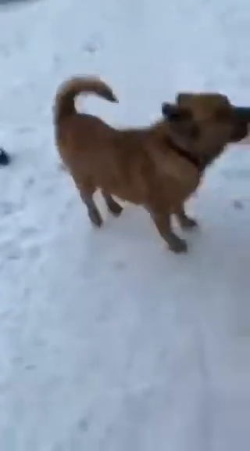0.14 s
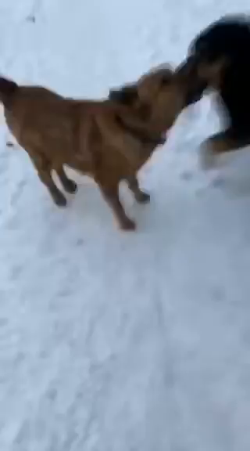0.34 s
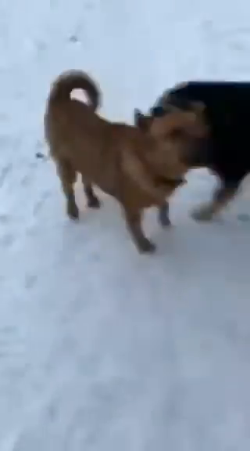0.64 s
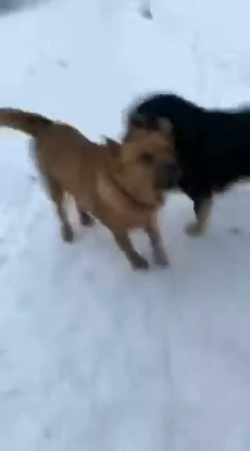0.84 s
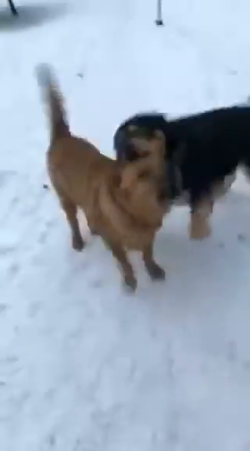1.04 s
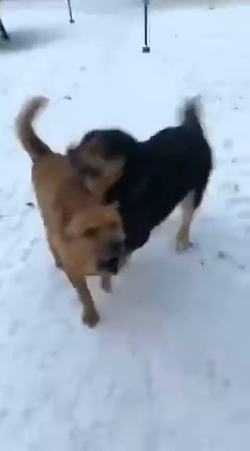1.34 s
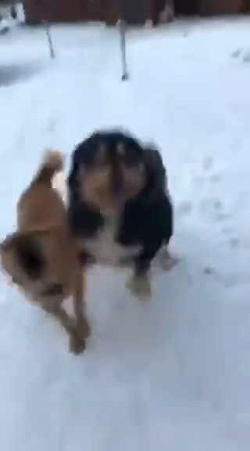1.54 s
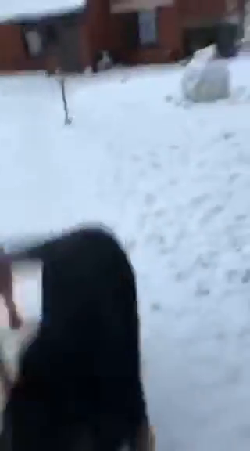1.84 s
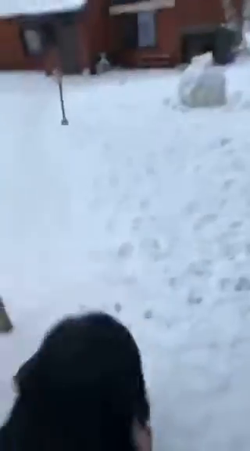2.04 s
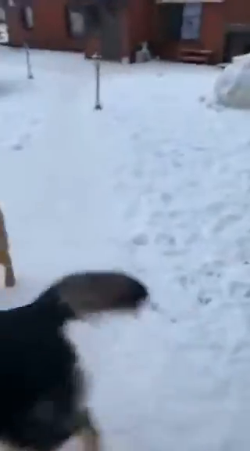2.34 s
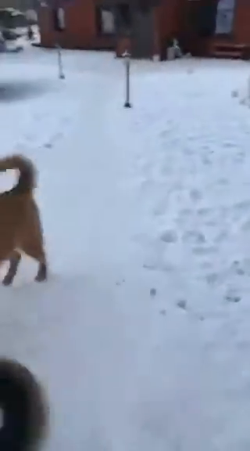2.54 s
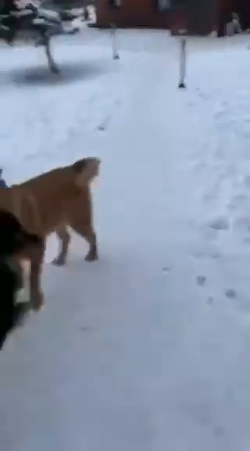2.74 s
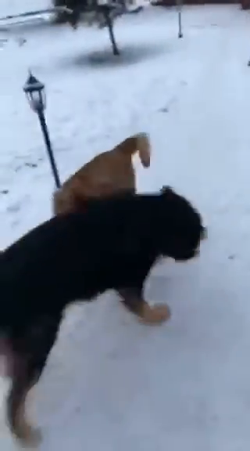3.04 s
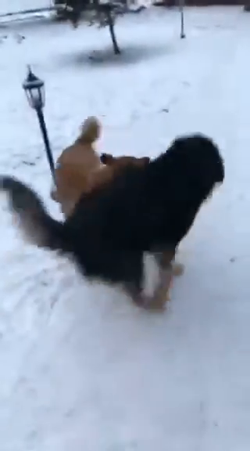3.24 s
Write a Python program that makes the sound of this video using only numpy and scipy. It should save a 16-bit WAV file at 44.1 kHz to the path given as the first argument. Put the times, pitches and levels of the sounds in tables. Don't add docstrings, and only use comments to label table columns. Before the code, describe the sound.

Gruff, raspy dog barks and growls at close range, with panting and snow crunches outdoors

```python
import sys
import numpy as np
from scipy import signal
from scipy.fft import rfft, irfft, next_fast_len
from scipy.io import wavfile
from scipy.ndimage import uniform_filter1d, map_coordinates

SR = 44100
rng = np.random.default_rng(int(sys.argv[2]) if len(sys.argv) > 2 else 0)


def boost(x):
    u = np.asarray(x, float) / 20
    return 10 ** u


def generate_wav(sig):
    pcm = np.round(np.clip(np.atleast_2d(sig).T, -1, 1) * 32767).astype(np.int16)
    wavfile.write(sys.argv[1], SR, pcm)


N = 149940

# time in seconds, level in dB.
WIND_LEVEL = [
    (0.0, -51),
    (2.91, -47.5),
    (3.4, -57.5),
]
# frequency in Hz, density in dB per Hz.
WIND_SPECTRUM = [(18, -17), (85, -4.5), (140, -9), (300, -19)]
# frequency in Hz, density in dB per Hz.
YARD_SPECTRUM = [(88, -38.5), (150, -6.5), (542, -6), (1300, -15.5), (4940, -26), (9000, -36.5),
                 (11700, -73.5), (19800, -120)]
# time in seconds, peak in dB.
CREAK_BEATS = [(.043, -33.5), (.107, -31), (0.598, -45), (0.641, -26), (0.684, -21.5), (0.729, -23.5),
               (1.145, -31.5), (1.197, -26.5), (2.106, -37), (2.157, -32.5), (2.203, -26), (2.253, -34)]
# frequency in Hz, width in Hz, level in dB.
CREAK_RESONANCES = [(85, 41, -11.5), (366, 88, -3), (990, 270, -10)]
# full strength at in seconds, rise in seconds, hold in seconds, level in dB, whistle in Hz.
PANTS = [
    (0.115, 0.022, 0.093, -39.5, 6120),
    (0.667, 0.14, 0.027, -41, 4500),
    (0.719, 0.043, 0.08, -41.5, 1970),
    (1.004, 0.072, 0.079, -48, 4400),
    (2.001, 0.019, 0.027, -49, 2200),
    (2.303, 0.08, 0.099, -42, 1990),
    (.54, 0.056, 0.084, -51.5, 1450),
    (3.25, 0.081, 0.096, -41.5, 4340),
]
# frequency in Hz, density in dB per Hz.
BREATH_SPECTRUM = [(410, -63), (700, -37), (905, -12.5), (975, -1.5), (4690, -8.5), (9000, -17.5),
                   (11700, -49), (19800, -120)]
# full strength at in seconds, rise, hold and fall in seconds, level in dB.
CALLS = [(.14, 0.035, .12, 0.063, -13.5), (0.447, 0.24, 0.036, 0.16, -28.5), (.815, 0.029, .13, 0.062, -15),
         (1.267, 0.2, 0.048, 0.07, -30), (1.371, 0.034, 0.099, 0.13, -14.5), (1.6, 0.16, 0.088, 0.075, -15),
         (1.831, 0.091, 0.091, 0.06, -15.5), (2.352, 0.055, 0.063, 0.21, -11.5),
         (2.58, 0.16, 0.0417, 0.062, -16.5), (2.739, 0.069, 0.069, 0.17, -14.5),
         (2.978, 0.15, 0.046, 0.11, -19), (1.001, 0.033, 0.1, 0.025, -40.5)]
# pitch in Hz, roughness 0-1, throat in Hz, mouth in Hz, mouth in dB.
VOICES = [(261.3, 0.64, 532, 723, -4.5), (204.3, 0.8, 390, 680, -7), (279.2, 0.66, 529, 693, -6),
          (197.8, 0.8, 590, 880, -11), (292.4, 0.8, 650, 950, -7.5), (258.3, 0.83, 527, 910, -10),
          (257, 0.8, 528, 876, -8.5), (274.3, .7, 529, 845, -8.5), (242, 0.89, 525, 1080, -14),
          (257.6, .8, 560, 1015, -8.5), (271, .9, 532, 840, 1.5), (208, 0.9, 530, 2300, -2)]
# low rasp in Hz, its level in dB, high rasp in Hz, its level in dB.
RASPS = [(1920, -31.5, 4400, -30), (1970, -24.5, 4720, -18.5), (2220, -22, 4150, -17.5),
         (2200, -8.5, 4820, -13), (2725, -20, 3960, -18), (2325, -24.5, 5020, -29),
         (2250, -28.5, 2800, -29), (2200, -29, 4300, -33.5), (2000, -40, 3320, -30.5),
         (2200, -33, 4340, -37.5), (1680, -24.5, 4700, -39.5), (2410, -9.5, 2700, -22.5)]
# frequency in Hz, level in dB.
UPPER_MOUTHS = [(1246, -18), (1300, -21), (1205, -16.5), (1400, -18.5), (1426, -15), (1400, -16),
                (1570, -15), (1370, -19), (1450, -23.5), (1490, -18), (1530, -19.5), (1400, -15.5)]
# start in seconds, length in seconds, from Hz, to Hz, level in dB.
LOCKS = [(.143, 0.045, 500, 535, -10), (.203, 0.025, 670, 430, -11.5), (.232, 0.042, 510, 450, -15),
         (0.2, 0.039, 700, 810, -17), (.128, 0.027, 350, 540, -16), (.797, 0.045, 301, 466, -15),
         (.825, 0.099, 483, 620, -12), (.855, 0.11, 263, 303, -21), (.805, 0.043, 880, 805, -18),
         (1.355, 0.036, 890, 990, -13.5), (1.36, 0.065, 560, 610, -10.5), (1.3, .025, 629, 520, -14.5),
         (1.385, 0.12, 330, 315, -25.5), (1.445, 0.07, 480, 489, -17.5), (1.22, 0.12, 580, 590, -35),
         (2.635, .07, 380, 380, -26.5), (0.175, 0.03, 1270, 1230, -22.5), (.13, .035, 960, 1000, -24),
         (.22, 0.022, 1050, 990, -22.5), (.915, 0.046, 640, 629, -16.5), (1.4, .022, 690, 650, -13.5),
         (1.655, .03, 690, 510, -14), (1.822, .025, 400, 437, -14.5), (1.865, .03, 550, 564, -18),
         (1.908, 0.023, 508, 510, -19), (2.35, 0.0695, 590, 515, -15), (2.41, 0.053, 390, 350, -16.5),
         (2.765, .06, 590, 526, -13.5)]
# time in seconds, strength in dB.
CATCHES = [(0.135, 2), (.150, 3), (0.189, 3), (.207, 2.5), (0.237, 1.5), (0.812, 3), (.833, 2.5),
           (0.854, 2), (.881, 3), (1.371, 2.5), (1.392, 2), (1.435, 3), (1.473, 2.5), (1.55, 1), (1.603, 1),
           (1.614, 2), (1.665, 3), (1.795, -1), (1.835, 3.5), (1.878, 0.5), (1.894, 2.5), (1.919, 2.5),
           (2.326, 3), (2.358, 2), (2.371, 1.5), (2.385, 2.5), (2.404, 2), (2.537, 4.5), (2.595, 4.5),
           (2.726, 0.5), (2.768, 3.5), (2.797, 2.5), (2.974, 3), (3.003, 1), (3.03, 0.5)]
# start in seconds, length in seconds, frequency in Hz, level in dB.
HISSES = [(.13, 0.024, 4380, -37.5), (0.811, 0.038, 4220, -32), (0.831, 0.024, 3190, -32),
          (0.899, 0.033, 2250, -35), (.945, .03, 2290, -36), (.97, 0.15, 2630, -46.5),
          (1.458, .035, 4170, -32.5), (1.638, .04, 2250, -38.5), (1.822, .03, 3050, -40),
          (2.578, 0.047, 3320, -42.5), (.9, .07, 4570, -35)]
# time in seconds, peak in dB, decay by 60 dB in seconds.
CRUNCHES = [
    (0.3188, -25, 0.016),
    (0.4822, -29.5, 0.013),
    (1.968, -16.5, 0.022),
    (1.9909, -21, 0.026),
]
# frequency in Hz, density in dB per Hz.
SNOW_SPECTRUM = [(530, -34), (900, -6), (2670, -6.5), (7490, -23.5), (9000, -30), (11700, -78),
                 (19800, -120)]
# time in seconds, level in dB.
THUDS = [
    (0.144, -32.5),
    (0.291, -34),
    (.7, -32.5),
    (.83, -41),
    (1.3, -38),
    (1.97, -41),
    (2.01, -35.5),
    (2.68, -45),
    (2.921, -42),
]
# from in seconds, to in seconds, level in dB.
GRUMBLES = [
    (0.283, 0.561, -36),
    (2.417, 3.1, -37),
]


def unit(x):
    return x / np.sqrt(np.mean(x ** 2) + 1e-20)


def wobble(rate, size):
    knots = rng.standard_normal(int(size * rate / SR) + 4)
    return map_coordinates(knots, [np.arange(size) * rate / SR])


def filtered(x, response):
    m = next_fast_len(len(x) + 8192)
    return irfft(rfft(x, m) * response(np.fft.rfftfreq(m, 1 / SR)), m)[:len(x)]


def peaks(rows):
    def response(f):
        return sum((-1) ** k * boost(db) * 1j * f * w / (c * c - f * f + 1j * f * w)
                   for k, (c, w, db) in enumerate(rows))
    return response


def hiss(points, size):
    f, db = np.transpose(points)

    def colour(hz):
        return boost(np.interp(np.log(hz + 1), np.log(f), db, -120, -120))
    return unit(filtered(rng.standard_normal(size), colour))


def shape(t, rise, hold, fall):
    depth_db = 31
    away = np.clip(-t / rise, 0, 3) + np.clip((t - hold) / fall, 0, 3)
    return boost(-depth_db * (away + 2 * np.clip(away - 1, 0, 2) ** 2))


def add(out, x, s):
    i = round(s * SR)
    x = x[max(-i, 0):][:N - max(i, 0)]
    out[max(i, 0):][:len(x)] += x


def yard():
    s, db = np.transpose(WIND_LEVEL)
    gust_db = np.interp(np.arange(N) / SR, s, db) + 3.5 + 1.5 * wobble(11, N)
    wind = boost(gust_db) * hiss(WIND_SPECTRUM, N)
    far_db = -47.5 + 1.5 * wobble(6, N)
    return wind + boost(far_db) * hiss(YARD_SPECTRUM, N)


def creaks():
    beats = np.zeros(N)
    for s, db in CREAK_BEATS:
        beats[round((s + .001) * SR)] = boost(db + 50.5)
    return filtered(beats, lambda f: peaks(CREAK_RESONANCES)(f) / (1 + 1j * f / 450) ** 2)


def pants():
    out, size = np.zeros(N), SR // 2
    t = np.arange(size) / SR - .2
    for s, rise, hold, db, hz in PANTS:
        whistle = peaks([(hz, 605, 19.5)])
        air = filtered(hiss(BREATH_SPECTRUM, size), lambda f: 3.5 + whistle(f))
        level = boost(db + 1.5 * wobble(56.5, size))
        add(out, level * unit(air) * shape(t, rise, hold, fall=.045), s - .2)
    return out


def glottis(phase, rough, gate):
    jitter, scatter_db, gated_db = 0.2925, 1.5, -0.5
    size = len(phase)
    draw = rng.standard_normal((2, 256))
    cycles = np.arange(256) + jitter * rough * draw[0]
    at = np.interp(cycles, phase, np.arange(size), 0, size - 1).astype(int)
    strength = boost(scatter_db * rough * draw[1]) * (at < size - 1)
    pulses = np.bincount(at, strength, size)
    noise = rng.standard_normal(size) * gate
    return unit(pulses - pulses.mean()) * (1 - .5 * rough) + boost(gated_db) * rough * unit(noise)


def tract(scale, throat, mouth, mouth_db, upper_hz, upper_db):
    modes = peaks([(305.7, 156, -8.5), (scale * throat, 120.7, 0),
                   (scale * mouth, 164, mouth_db), (upper_hz, 317, upper_db)])

    def response(f):
        low_cut = (1j * f / (107 + 1j * f)) ** 3
        soft_folds = 1 / (1 + (1j * f / 1400)) ** 2
        roof = 1 / np.sqrt(1 + (f / upper_hz / 1.125) ** 12)
        return low_cut * modes(f) * soft_folds * roof
    return response


def rasp(air, lo, lo_db, hi, hi_db):
    def band(centre, width):
        ring = unit(filtered(air, lambda f: peaks([(centre, width, 0)])(f) ** 2))
        return ring * boost(2.5 * wobble(29.7, len(air)))
    low = boost(lo_db) * band(lo, 800)
    high = boost(hi_db) * band(hi, 1600)
    return low + high + boost(-10 + 0.94 * hi_db) * band(6070, 2370)


def calls():
    arch, closing = .08, 0.72
    out, size = np.zeros(N), SR // 2
    t = np.arange(size) / SR - .2
    for call, voice_row, rasp_row, upper in zip(CALLS, VOICES, RASPS, UPPER_MOUTHS):
        s, rise, hold, fall, db = call
        hz, rough, *mouth = voice_row
        bend = 1 + arch * (1 - np.clip(2 * t / hold - 1, -2, 2) ** 2)
        phase = np.cumsum(hz * bend) / SR
        gate = (.5 + .5 * np.cos(2 * np.pi * phase)) ** 2
        flutter = boost(wobble(69.86, size))
        source = glottis(phase, rough, gate) * flutter
        env = shape(t, rise, hold, fall)
        shut = np.clip((t - 1.06 * hold) / (hold + fall) * 2, 0, 1)
        opened = filtered(source * env * (1 - shut), tract(1, *mouth, *upper))
        closed = filtered(source * env * shut, tract(closing, *mouth, *upper))
        voice = (opened + closed) / np.std(filtered(source, tract(0.96, *mouth, *upper)))
        air = (rng.standard_normal(size) * gate + 1.1 * rng.standard_normal(size)) * flutter
        onset = 1 + 0.38 * np.exp(-(t / 0.038) ** 2)
        add(out, boost(db) * (voice + rasp(air, *rasp_row) * env ** 0.53 * onset), s - .2)
    return out


def locks():
    out = np.zeros(N)
    for s, length, start_hz, end_hz, db in LOCKS:
        u = np.arange(round(.12 * SR)) / SR / length
        hz = (start_hz + (end_hz - start_hz) * u) * (1 + .015 * wobble(65.6, len(u)))
        level = boost(db + 2.0 + 2.2 * wobble(47.6, len(u)))
        swell = np.sin(np.pi * np.clip(u, 0, 1)) ** 0.56
        add(out, swell * level * np.sin(2 * np.pi * np.cumsum(hz) / SR), s)
    return out


def hisses():
    sharpness = 7.3
    out, size = np.zeros(N), SR // 6
    for s, length, hz, db in HISSES:
        gap = peaks([(hz, hz / sharpness, 0)])
        air = unit(filtered(rng.standard_normal(size), lambda f: gap(f) ** 2))
        swell = np.sin(np.pi * np.clip(np.arange(size) / SR / length, 0, 1)) ** .6
        add(out, boost(db + 3 * wobble(150, size)) * swell * air, s)
    return out


def surges():
    tire_db_per_s, tired_db = 256, -2
    s, db = np.transpose(CATCHES)
    t = np.arange(N) / SR
    last = np.clip(np.searchsorted(s, t) - 1, 0, None)
    strength_db = np.maximum(db[last] - tire_db_per_s * np.abs(t - s[last]), tired_db)
    return boost(uniform_filter1d(strength_db, size=90))


def paws():
    out, size = np.zeros(N), SR // 8
    t = np.arange(size) / SR
    for s, db, t60 in CRUNCHES:
        fade_db = -60 * np.clip(t - .002, 0, 1) / t60
        crack_db = db - 8.5 + fade_db + 2.6 * wobble(1320, size)
        add(out, boost(crack_db) * hiss(SNOW_SPECTRUM, size), s - .0015)
    thud_hz, thud_s = 78, 0.013
    for s, db in THUDS:
        turn = np.pi * np.cumsum(thud_hz * np.exp(0.31 * wobble(34, size))) / SR
        ring = np.sin(2 * turn) + .7 * np.sin(turn)
        add(out, boost(db + 13.5) * t / thud_s * np.exp(-t / thud_s) * ring, s - .01)
    return out


def grumbles():
    t = np.arange(N) / SR
    level = sum(boost(db) * np.clip(np.minimum(t - a, b - t) / .05, 0, 1) for a, b, db in GRUMBLES)
    air = rng.standard_normal(N) * boost(4 * wobble(45, N))
    return level * unit(filtered(air, peaks([(288, 130, -2), (680, 300, -4), (1710, 410, -13)])))


def echo(dogs):
    level_db, t60_s = -19.5, 0.19
    t = np.arange(SR // 3) / SR
    tail = filtered(rng.standard_normal(len(t)) * boost(-60 * t / t60_s), lambda f: 1 / (1 + 1j * f / 2500))
    delayed = np.pad(dogs, (600, 0))
    return boost(level_db) * signal.fftconvolve(delayed, tail / np.linalg.norm(tail))[:N]


def scene():
    clear = locks()
    hush = 1 / (1 + 2.12 * uniform_filter1d(np.abs(clear), size=400))
    rough = calls()
    chest = filtered(rough, lambda f: 1 / (1 + (f / 850) ** 4))
    voice = (rough - (1 - hush) * chest + clear) * surges()
    dogs = voice + grumbles() + pants() + creaks() + hisses()
    return (dogs + echo(dogs) + paws() + yard())[None]


def patchy(x):
    hz, t, z = signal.stft(x, SR, nperseg=1024, noverlap=768)

    def blur(bins, frames):
        across = uniform_filter1d(rng.standard_normal(z.shape), size=bins, axis=0)
        return unit(uniform_filter1d(across, size=frames, axis=1))
    octave = np.log2(np.clip(hz / 720, .5, 20))[:, None]
    holes = 1 / (1 + np.exp(-6 * (blur(bins=4, frames=14) - 2.1 + 0.24 * octave)))
    holes_db = -24 * holes * (octave > -1)
    patches_db = 3.5 * np.clip(octave + .5, 0, 1) * blur(bins=3, frames=5)
    edge_hz = 9020 + 200 * unit(uniform_filter1d(rng.standard_normal(len(t)), size=4))
    top_db = -50 / (1 + np.exp(-(hz[:, None] - edge_hz) / 60))
    return signal.istft(z * boost(holes_db + patches_db + top_db), SR, nperseg=1024, noverlap=768)[1][:N]


def low_pass(x):
    return signal.sosfilt(signal.butter(12, 9990, fs=SR, output="sos"), x)


def record(dry):
    ceiling, knee = .71, 4.5
    x = patchy(dry[0])
    x = x / (1 + np.abs(x / ceiling) ** knee) ** (1 / knee)
    x = x * np.clip((N - np.arange(N)) / SR / 0.017, .1, 1)
    return low_pass(x[None])


dry = scene()
out = record(dry)
generate_wav(out)
```